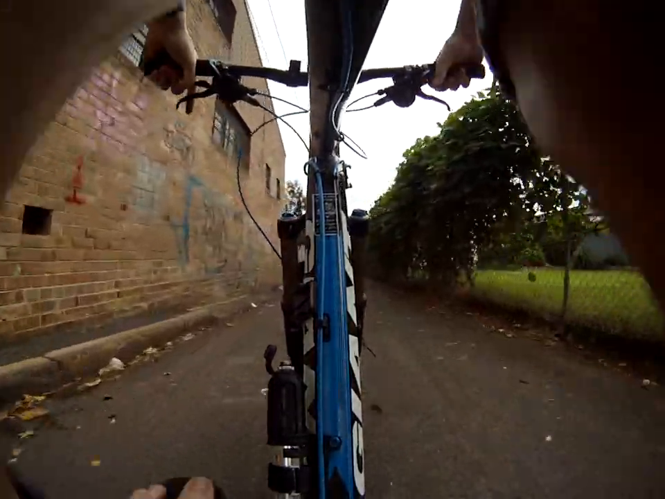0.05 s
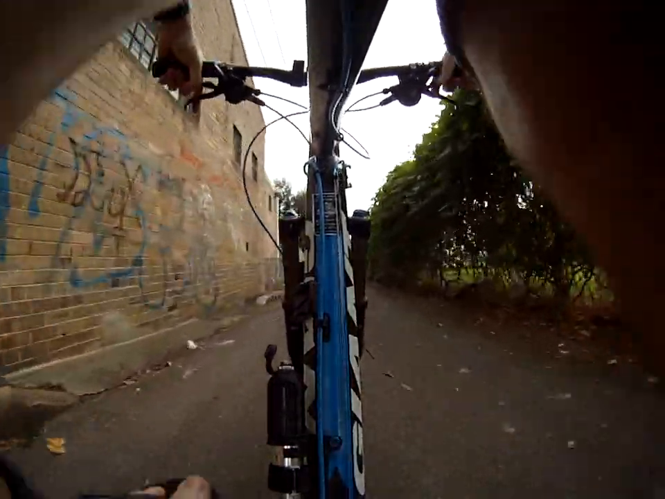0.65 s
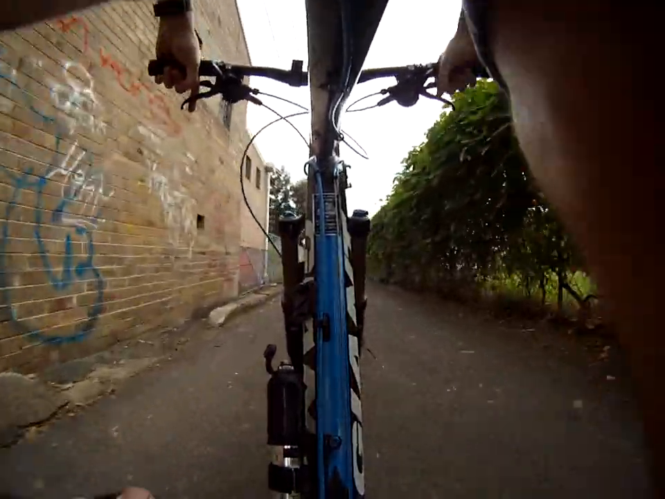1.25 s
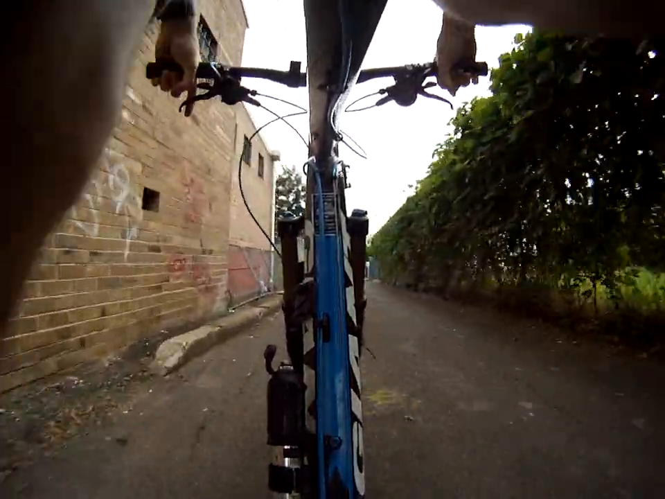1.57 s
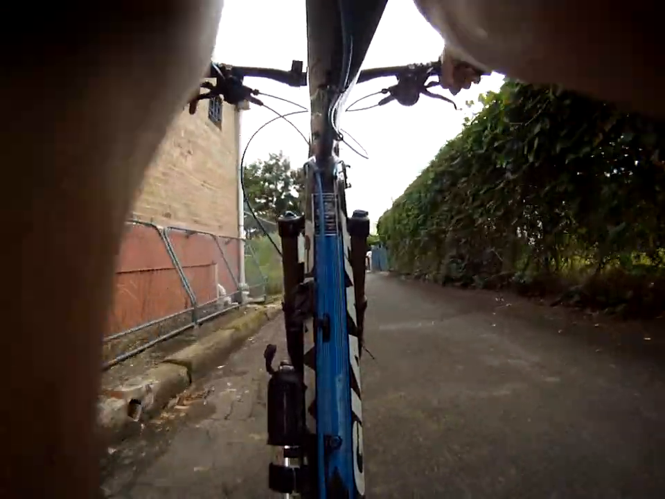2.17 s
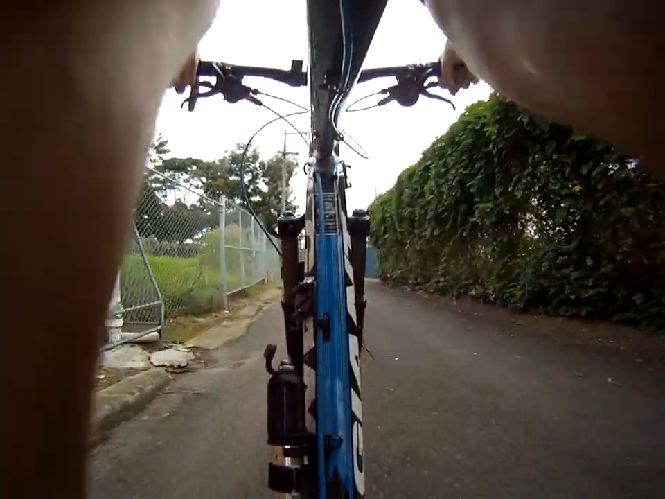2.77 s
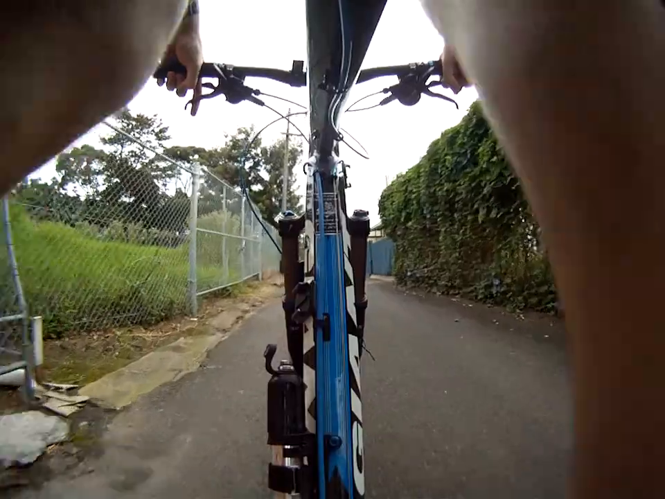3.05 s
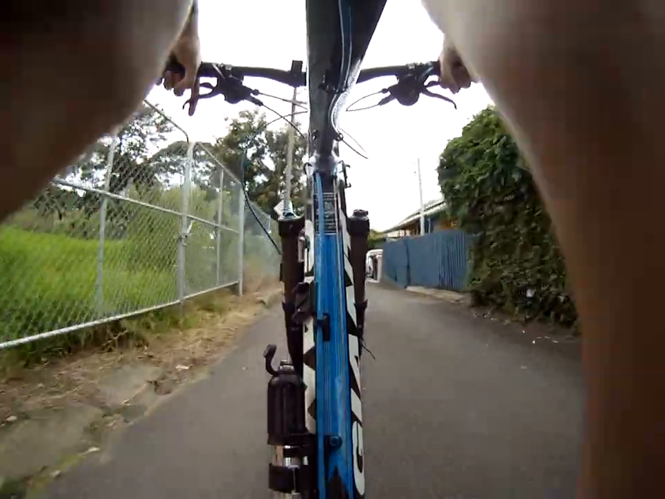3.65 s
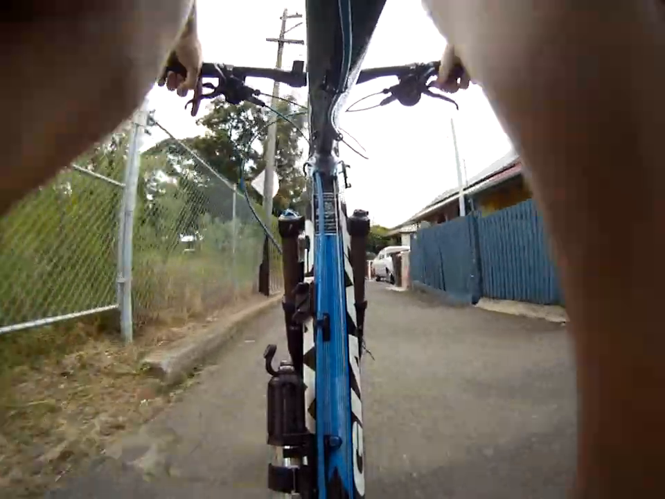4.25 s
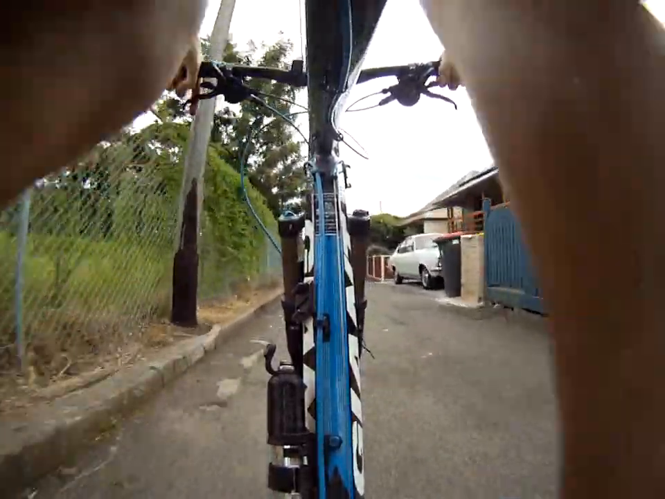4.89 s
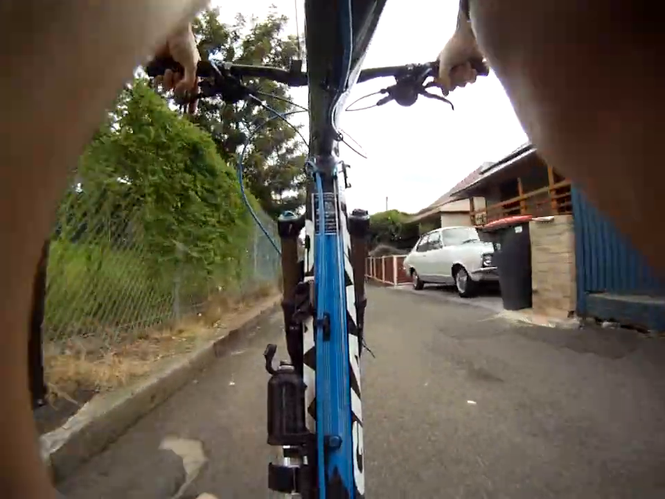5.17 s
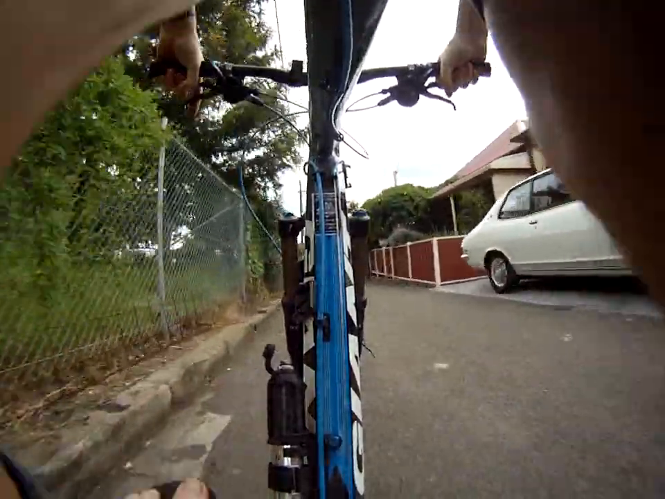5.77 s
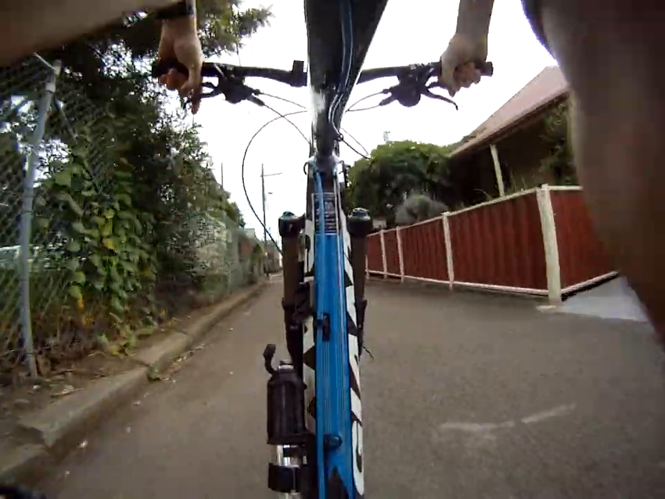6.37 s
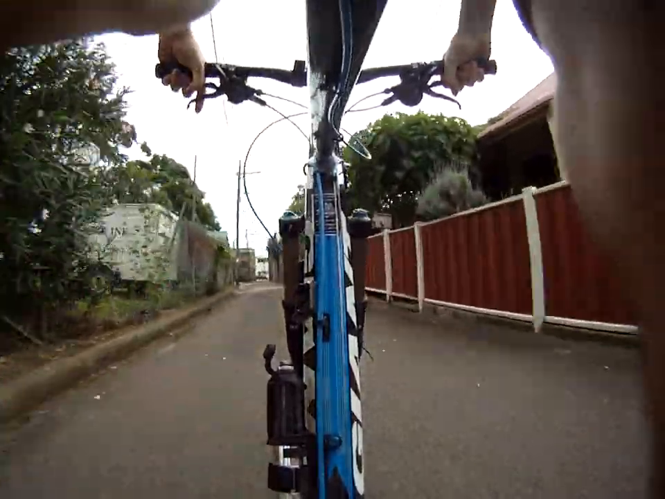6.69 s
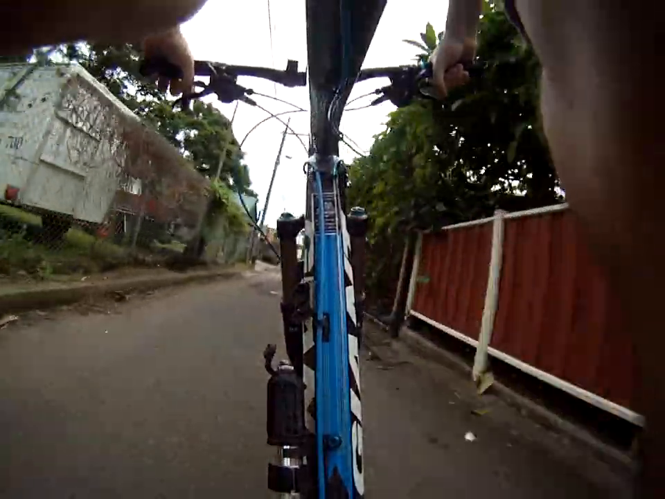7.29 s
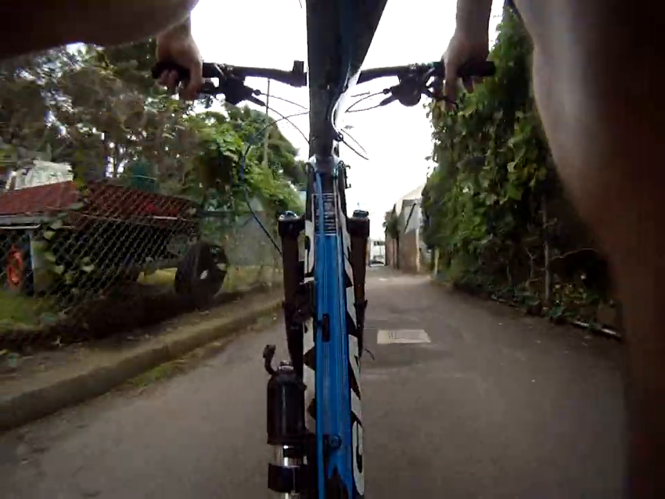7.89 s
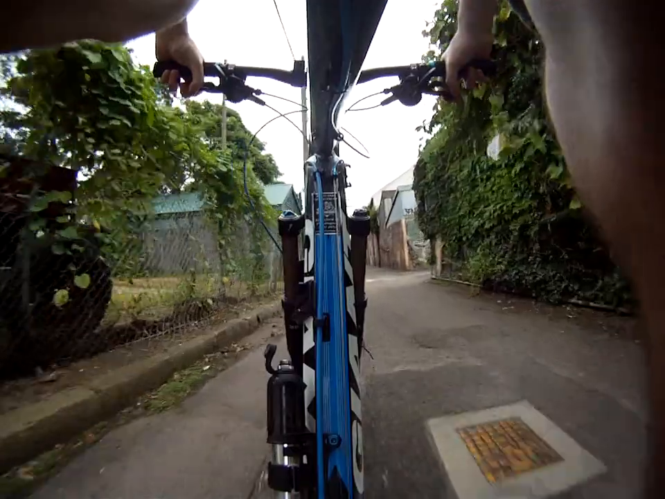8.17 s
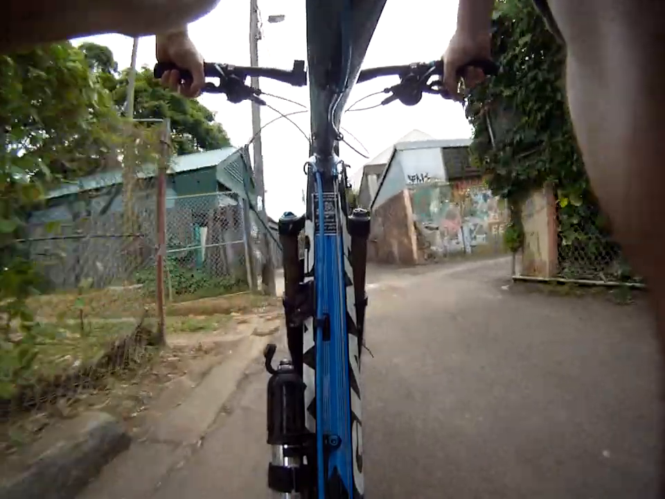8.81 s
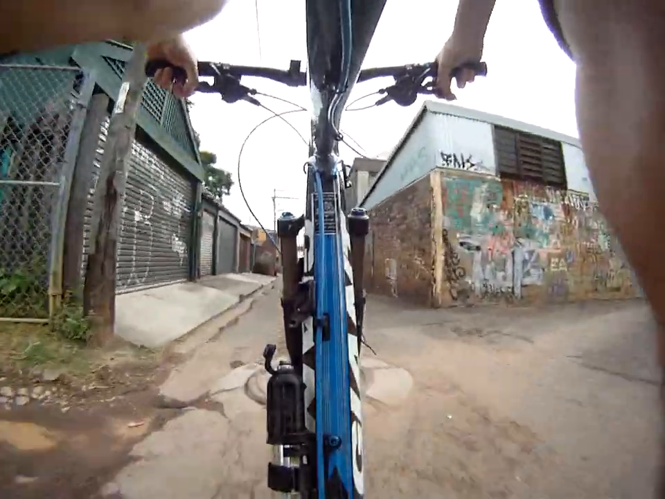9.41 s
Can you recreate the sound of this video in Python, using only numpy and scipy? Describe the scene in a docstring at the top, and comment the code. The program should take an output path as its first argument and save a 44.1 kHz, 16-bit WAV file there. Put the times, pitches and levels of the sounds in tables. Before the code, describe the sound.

A bicycle rolls along pavement with a heavy rumble, humming tyres, a purring chain and sharp clacks of gear changes.

```python
"""A mountain bike rolls along a paved lane, heard from a small camera clamped to its frame.
From the start the road shakes camera and frame, tyres hum and crunch on grit, and the chain purrs.
The chain clacks across the cogs in the first second or so, again after 4 s, then slams into top gear.
From about 6.5 s the rider coasts, and the brake disc squeaks faintly. Throughout, the camera turns
itself down after loud clacks, and its 12 kHz stepped output adds a glassy fizz."""
import sys
import numpy as np
from scipy import signal
from scipy.fft import rfft, irfft
from scipy.io import wavfile
from scipy.ndimage import uniform_filter1d

SR = 44100
rng = np.random.default_rng(int(sys.argv[2]) if len(sys.argv) > 2 else 0)


def bounce(signal):
    """Save signal as a 16-bit WAV file at the path given by the first command-line argument."""
    frames = np.transpose(np.atleast_2d(signal))
    limited = np.clip(frames, -1, 1)
    pcm = np.round(limited * 32767).astype(np.int16)
    wavfile.write(sys.argv[1], SR, pcm)


N = 425565
TIME = np.arange(N) / SR

# Levels in the tables are relative: the mix and the camera change them further.
# how hard the camera shakes on its mount: t/s, level/dB
CAMERA_SHAKE = [(0, -18), (.25, -16.5), (.4, -21.5), (1.15, -27.5), (1.52, -17), (1.8, -22), (2.3, -18),
                (3.0, -22.5), (3.75, -29), (4.1, -21), (4.7, -24.5), (5.25, -20.5), (5.95, -20),
                (6.25, -25), (6.9, -19), (7.85, -22), (8.05, -17), (9.65, -20.5)]
# the pavement under the tyres: t/s, frame drone level/dB, grit level/dB
PAVEMENT = [(0, -20.5, -24), (.25, -18.5, -26), (.65, -20.5, -28), (1.0, -19, -27), (1.28, -22.5, -33),
            (1.5, -19, -28), (2.2, -19, -28), (3.1, -18, -25.5), (4.2, -17.5, -24), (5.2, -18.5, -29.5),
            (5.7, -18, -27), (6.55, -17, -27.5), (6.8, -18, -31.5), (7.3, -16, -27), (7.95, -17.5, -30),
            (8.1, -21.5, -33.5), (8.45, -22, -33.5), (9.35, -18, -27), (9.65, -19.5, -36.5)]
# hum of the tyre knobs: t/s, f/Hz, level/dB
TYRE_HUM = [(0, 235, -40), (1.8, 254.4, -25), (3.2, 275.9, -22), (3.8, 297, -20.5), (4.2, 312, -23),
            (5.2, 296, -42.5), (7.5, 276, -28.5), (9.65, 264.5, -32)]
# the brake disc grazes its pad: t/s, level/dB, f/Hz, length/s
BRAKE_SQUEAKS = [(7.332, -34, 2346, .05), (7.392, -26, 2340, 0.026), (7.884, -25.5, 2340, 0.064),
                 (8, -31, 2280, 0.029), (8.76, -30.5, 352, 0.68)]
# the tyres meet stones and cracks: t/s, level/dB
ROAD_BUMPS = [(1.259, -28), (1.447, -14.5), (1.984, -16.5), (2.7404, -12), (6.170, -17), (7.341, -14),
              (8.335, -20), (8.720, -14), (9.598, -16.5)]
# light ticks of chain and cables: t/s, level/dB
LIGHT_TICKS = [(3.113, -22), (3.13, -22), (3.368, -25), (3.458, -23), (4.576, -14.5), (4.962, -30),
               (6.303, -28), (8.49, -30), (8.541, -24.5), (8.633, -27), (8.729, -31), (9.367, -21.5)]
# pedalling pace, which climbs within a gear and drops at a change: t/s, speed/(links per s)
CHAIN_SPEED = [(0, 66), (1.05, 64), (1.2, 61), (2.0, 62.5), (3.3, 65.3), (4.55, 73), (4.7, 68.3), (6.4, 69)]
# chain rattle, hushed while coasting and shaken again by rough ground: t/s, level/dB
CHAIN_RATTLE = [(0, -24), (.3, -29), (1.0, -28.5), (1.3, -33.5), (2.0, -30.5), (2.7, -28.5), (3.45, -27.5),
                (4.3, -28), (5.1, -34), (6.05, -31), (6.4, -33.5), (6.7, -36.5), (7.7, -37), (8.2, -32.5),
                (8.9, -30.5), (9.3, -24), (9.65, -34.5)]
# the chain rubs its guide: t/s, length/s, level/dB
GUIDE_RASPS = [(1.99, .06, -26), (2.68, .12, -27), (3.12, .08, -22.5), (3.46, .10, -24.5), (6.3, .08, -29),
               (9.27, .16, -25)]
# the chain changes gear: t/s, length/s, scrape level/dB, frame shudder level/dB
GEAR_SHIFTS = [(0.49, 0.19, -16, -12), (1.141, 0.11, -16, -13.5)]
# bright snaps of the chain climbing between cogs: t/s, level/dB, main ring f/Hz, thud level/dB
CHAIN_CLACKS = [(.1025, -6.5, 1500, -14), (.2278, -3, 1520, -35), (.7715, -1.5, 1500, -12),
                (.8812, -2.5, 1540, -20), (4.130, -4, 1490, -21), (4.2795, -4, 1550, -30)]
# duller knocks of the chain dropping onto a cog: t/s, level/dB, main ring f/Hz, thud level/dB
CHAIN_KNOCKS = [(.4595, -2, 1480, 3), (.4755, -8, 1600, -18), (.495, 1.5, 1370, -6), (.501, 0.5, 1490, 1),
                (.512, -5, 1660, -11), (.534, -20, 1580, -26), (1.045, -1, 1510, -1.5),
                (1.1075, -6.5, 1310, -4), (1.1315, -3.5, 1480, -15), (1.1445, -5.5, 1150, -23),
                (1.149, -6.5, 1430, -5.5)]

# A mode is a pitch at which a part likes to ring; the wider it is, the sooner it dies away.
# All the mode tables list: f/Hz, width/Hz, level/dB
MOUNT_MODES = [(29.5, 27, -11), (58, 49, 2), (87, 38, -5)]  # the camera's clamp
FRAME_MODES = [(152, 63, -18.5), (197.5, 49.4, -9), (251, 35.5, 1.5), (285.8, 57, -7), (350, 52, -19.5),
               (453, 62, -16.5), (540.7, 133, -11.5), (747, 58, -22.5)]  # the frame tubes
GRIT_MODES = [(984, 103, -3.5), (1255, 360, -2.5), (1522, 240, 0.5), (2245, 184, -9.5), (2960, 230, -26.5),
              (3603, 250, -21), (5280, 2100, -36)]  # tyres on small stones
FORK_MODES = [(540, 190, 0), (1100, 250, -2), (2100, 140, 1), (2280, 230, -7.5), (3420, 540, -21)]  # fork and wheel
THUD_MODES = [(200, 180, 7.5), (310, 180, -14), (503, 136, 7)]  # the jolted frame
TICK_MODES = [(2220, 250, 8.5), (3640, 230, 5.5), (4500, 250, -16), (5230, 720, -17.5)]  # lightly touched metal
CHAIN_MODES = [(1660, 154, -1), (2040, 373, 2), (2273, 240, 0), (3090, 330, -12), (3507, 557, -11.5),
               (4470, 230, -33), (5530, 820, -37)]  # the chain's links
CLACK_MODES = [(536, 100, 2.5), (1080, 360, -7), (2050, 320, -3), (2380, 180, -2.5), (2900, 1400, -20),
               (3820, 220, -13.5), (4470, 120, -16.5), (5040, 210, -11.5), (5520, 420, -18.5)]  # cogs as the chain climbs
KNOCK_MODES = [(510, 90, -11), (1024, 310, -7), (2100, 230, -6), (2220, 230, -7), (3660, 560, -17),
               (5300, 1200, -32)]  # cogs as the chain drops
SLAM_MODES = [(290, 200, -7.5), (520, 240, -10), (1340, 220, 4.5), (2200, 180, 0.5), (3780, 450, -19),
              (4900, 1000, -21)]  # top gear hit by the tight chain


def gain_of(db):
    """Turns decibels into a number to multiply a sound by."""
    return 10 ** (np.asarray(db) / 20)


def evened(x):
    """Scales a signal to an average strength (rms) of 1."""
    return x / np.sqrt(np.mean(x ** 2) + 1e-20)


def curves(table):
    """Joins a table's points with straight lines in time, one curve per value column."""
    times, *columns = np.transpose(table)
    return [np.interp(TIME, times, column) for column in columns]


def add(mix, t, sound):
    """Mixes a sound in, starting at t seconds."""
    part = mix[max(round(t * SR), 0):][:len(sound)]
    part += sound[:len(part)]


def swell(t, length):
    """A smooth rise and fall centred on t seconds."""
    return np.cos(np.pi * np.clip((TIME - t) / length, -.5, .5)) ** 2


def wander(rate_hz, size=32768):
    """A smooth random drift of strength 1, mostly slower than rate_hz."""
    hz = np.fft.rfftfreq(size, N / SR / size)
    coarse = irfft(rfft(rng.standard_normal(size)) / (1 + (hz / rate_hz) ** 4), size)
    return np.interp(TIME, np.linspace(0, N / SR, size), evened(coarse))


def grains(per_s, spread_db):
    """Tiny random hits of uneven size."""
    sizes = gain_of(spread_db * np.minimum(rng.exponential(1, N), 4))
    return evened(sizes * rng.choice([-1, 1], N) * (rng.random(N) < per_s / SR))


def ring(x, modes, size=16384):
    """Lets x shake a part that rings at these modes."""
    hz = abs(np.fft.fftfreq(size, 1 / SR))
    power = sum(gain_of(db) ** 2 / (1 + (2 * (hz - f) / width) ** 2) ** 2 for f, width, db in modes)
    log_gain = np.log(power + 1e-10) / 2
    spectrum = np.exp(np.conj(signal.hilbert(log_gain)))  # rings only after a hit, never before
    response = np.fft.ifft(spectrum).real
    return signal.oaconvolve(x, response[:size // 2])[:len(x)]


def strike(modes, contact_s, size=2048):
    """A quick scatter of touches rings a part; its loudest 3 ms have strength 1."""
    age = np.arange(size) / SR / contact_s
    contact = age * np.exp(1 - 2 * age)
    spectrum = rfft(contact * rng.standard_normal(size))
    flat = spectrum / (abs(spectrum) + 1e-12)  # a hard hit feeds all modes alike
    force = irfft(flat, size) * np.sqrt(contact)
    sound = ring(force, modes, size)
    return sound / np.sqrt(uniform_filter1d(sound ** 2, size=132).max())


def blow(db, modes, contact_s, thud_db):
    """One blow rings the metal and sends a thud through the frame."""
    metal = gain_of(db) * strike(modes, contact_s)
    return metal + gain_of(thud_db) * strike(THUD_MODES, contact_s=0.00094)


def mount_rumble(level_db, sway_hz=60, usual_db=-21):
    """The road rocks the camera on its clamp; a rumble follows the shaking only partly."""
    turns = np.cumsum(sway_hz * (1 + 0.0546 * wander(rate_hz=11.2))) / SR
    sway = evened(np.sin(2 * np.pi * turns) * gain_of(2.04 * wander(rate_hz=10)))
    rumble = evened(ring(rng.standard_normal(N), MOUNT_MODES))
    rumble_db = -25 + 0.39 * (level_db - usual_db)
    return gain_of(level_db - 2.5) * sway + gain_of(rumble_db) * rumble


def frame_drone(level_db):
    """Rough pavement drums on the frame tubes."""
    return gain_of(level_db + 0.27) * evened(ring(grains(per_s=3000, spread_db=3), FRAME_MODES))


def tyre_hum(waver=0.022, flutter_db=4):
    """Knobs slap the road in a wavering hum that climbs with speed, with a ragged octave above it."""
    hz, level_db = curves(TYRE_HUM)
    turns = np.cumsum(hz * (1 + waver * wander(rate_hz=30.16))) / SR
    octave = np.sin(2 * np.pi * (2 * turns + .25 * wander(rate_hz=45)))
    hum = np.sin(2 * np.pi * turns) + gain_of(-12) * octave
    return gain_of(level_db) * evened(hum * gain_of(flutter_db * wander(rate_hz=14)))


def grit(level_db, flutter_db=1.7):
    """Small stones crunch under the tyres."""
    crunch = grains(per_s=2500, spread_db=3) * gain_of(flutter_db * wander(rate_hz=12.7))
    return gain_of(level_db) * evened(ring(crunch, GRIT_MODES))


def pebbles(grit_db, per_s=45):
    """Larger grains pop out from under the tyres."""
    sizes = np.sign(rng.standard_normal(N)) * rng.uniform(0.29, 1, N)
    pops = sizes * (rng.random(N) < per_s / SR)
    return gain_of(grit_db - 13) * evened(ring(pops, GRIT_MODES))


def brake_squeaks(waver=0.023):
    """The brake disc grazes its pad, making unsteady chirps and a faint moan."""
    out, drift = np.zeros(N), wander(rate_hz=140)
    for t, db, hz, length in BRAKE_SQUEAKS:
        pitch = hz * (1 + waver * drift[abs(TIME - t) < length / 2])
        tone = np.sqrt(2) * np.sin(2 * np.pi * np.cumsum(pitch) / SR)
        add(out, t - length / 2, gain_of(db) * np.hanning(len(tone)) * tone)
    return out


def ticks(early_s=0.00197):
    """Light touches of chain and cables ring only high modes."""
    out = np.zeros(N)
    for t, db in LIGHT_TICKS:
        add(out, t - early_s, gain_of(db) * strike(TICK_MODES, contact_s=0.0024))
    return out


def bumps(early_s=0.00111):
    """Stones and cracks ring the fork; a harder hit also thuds harder."""
    out = np.zeros(N)
    modes = FORK_MODES + [(1480, 340, 5)]  # add the strongest mode
    for t, db in ROAD_BUMPS:
        add(out, t - early_s, blow(db, modes, contact_s=0.0016, thud_db=db - 6))
    return out


def pedalling(coast_s=6.5, ease_off_s=0.18, teeth=44):
    """Legs push in turn until the rider coasts: gives pull (0 to 1), links passed and push (-1 to 1)."""
    pull = np.clip((coast_s - TIME) / ease_off_s + .5, 0, 1)
    links = np.cumsum(curves(CHAIN_SPEED)[0]) / SR
    pushes = 2 * links / teeth  # two for each turn of the front cog
    return pull, links, pull * np.cos(2 * np.pi * (pushes - 0.016))


def chain_purr(level_db, pull, links):
    """Loose links jingle in uneven bursts; under pull each one also snaps onto its tooth."""
    link_phase = (links + .09 * wander(rate_hz=25)) % 1
    snaps = 2.8 * pull * np.exp(-link_phase / 0.21)
    jingle = grains(per_s=5000, spread_db=2) * (1 + snaps)
    bursts_db = 2.1 * wander(rate_hz=40) + .7 * wander(rate_hz=8.8)
    return gain_of(level_db) * evened(ring(jingle * gain_of(bursts_db), CHAIN_MODES))


def rolling(push_road_db=0.62, push_chain_db=1.25, uneven_db=0.97):
    """The steady ride: each pedal push presses the tyres on the uneven road and tightens the chain."""
    drone_db, grit_db = curves(PAVEMENT)
    shake_db = curves(CAMERA_SHAKE)[0]
    chain_db = curves(CHAIN_RATTLE)[0]
    pull, links, push = pedalling()
    load_db = push_road_db * push + uneven_db * wander(rate_hz=9)
    shaking = mount_rumble(shake_db) + frame_drone(drone_db + load_db)
    tyres = tyre_hum() + grit(grit_db + load_db) + pebbles(grit_db + load_db)
    return shaking + tyres + chain_purr(chain_db + push_chain_db * push, pull, links)


def chain_rasps():
    """The sides of the chain rub its guide in short, coarse rasps."""
    rub = evened(ring(grains(per_s=900, spread_db=2.5), CHAIN_MODES))
    return rub * sum(gain_of(db) * swell(t, length) for t, length, db in GUIDE_RASPS)


def gear_scrapes():
    """The chain drags over the cog teeth in a short swell that shakes the frame."""
    scrape = evened(ring(grains(per_s=3000, spread_db=6), CHAIN_MODES))
    shudder = evened(ring(grains(per_s=1500, spread_db=1.5), THUD_MODES))
    out = np.zeros(N)
    for t, length, scrape_db, shudder_db in GEAR_SHIFTS:
        out += swell(t, length) * (gain_of(scrape_db) * scrape + gain_of(shudder_db) * shudder)
    return out


def chain_blows(table, modes, main_width_hz, main_db, contact_s, early_s=0.001085, scatter_db=1.5):
    """The chain hits the cogs; each cog adds its own main ring, and each spot favours other modes."""
    out = np.zeros(N)
    for t, db, main_hz, thud_db in table:
        struck = [(hz, width, mode_db + scatter_db * rng.standard_normal())
                  for hz, width, mode_db in modes]
        struck.append((main_hz, main_width_hz, main_db))
        add(out, t - early_s, blow(db, struck, contact_s, thud_db))
    return out


def chain_slam(start_s=4.6539):
    """The tight chain slams into top gear with one hard, ringing blow."""
    out = np.zeros(N)
    add(out, start_s, gain_of(5) * strike(SLAM_MODES, contact_s=0.0023))
    return out


def scene():
    """Everything reaches the camera through the frame, so there is no echo."""
    clacks = chain_blows(CHAIN_CLACKS, CLACK_MODES, main_width_hz=192, main_db=4, contact_s=0.0016)
    knocks = chain_blows(CHAIN_KNOCKS, KNOCK_MODES, main_width_hz=250, main_db=1.5, contact_s=0.0041)
    ride = gain_of(0.94) * rolling()
    gears = gear_scrapes() + chain_rasps() + clacks + knocks + chain_slam()
    return (ride + gears + bumps() + ticks() + brake_squeaks())[None]


def limiter(x, threshold_db=-11, ratio=6, fall_db_per_s=50, attack_s=0.007, window_s=0.0079):
    """Turns loud sound down within milliseconds, then creeps back up."""
    power_db = 10 * np.log10(abs(uniform_filter1d(x ** 2, int(window_s * SR))) + 1e-12)
    fall_db = TIME * fall_db_per_s
    peak_db = np.maximum.accumulate(power_db + fall_db) - fall_db  # jumps up, sinks slowly
    cut_db = np.maximum(peak_db - threshold_db, 0) * (1 - 1 / ratio)
    smoothing = np.exp(-1 / (attack_s * SR))
    return x / gain_of(signal.lfilter([1 - smoothing], [1, -smoothing], cut_db))


def low_pass(x, hz):
    """Sharply cuts away everything above hz."""
    return signal.oaconvolve(x, signal.firwin(301, hz, window=("kaiser", 8), fs=SR), "same")


def record(dry, camera_rate_hz=12000, top_hz=15200):
    """The camera cuts the deepest bass, limits and clips; its stepped output adds a high fizz."""
    heard = signal.sosfilt(signal.butter(4, 19, "highpass", fs=SR, output="sos"), dry[0])
    clipped = np.clip(limiter(heard), -1, 1)
    band = low_pass(clipped, camera_rate_hz * .48)
    # holding each sample as a step mirrors the sound around the camera's rate and softens the highs
    mirrored = band * (1 + 2 * np.cos(2 * np.pi * camera_rate_hz * TIME))
    softening = np.sinc(np.fft.rfftfreq(N, 1 / SR) / camera_rate_hz)
    stepped = irfft(rfft(mirrored) * softening, N)
    return low_pass(stepped, top_hz)[None]


dry = scene()
out = record(dry)
bounce(out)
```